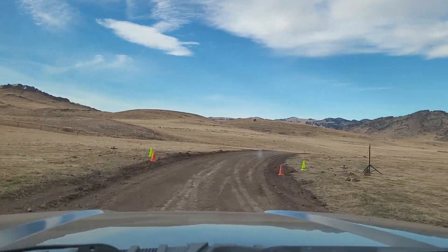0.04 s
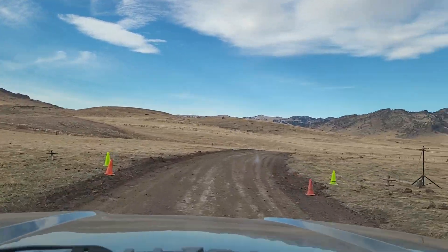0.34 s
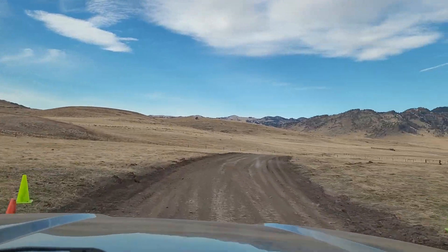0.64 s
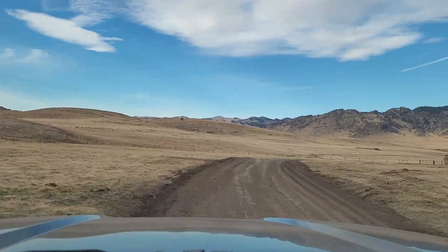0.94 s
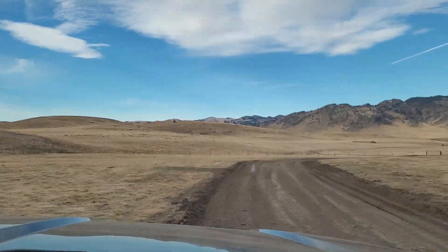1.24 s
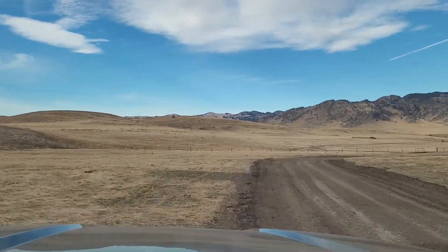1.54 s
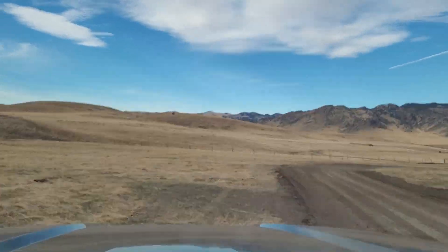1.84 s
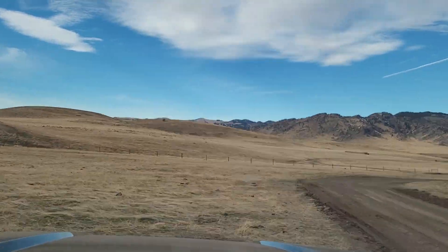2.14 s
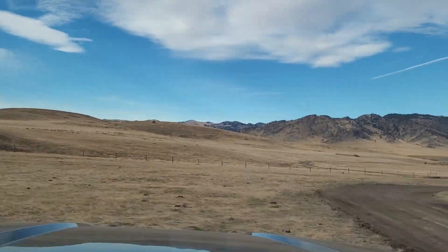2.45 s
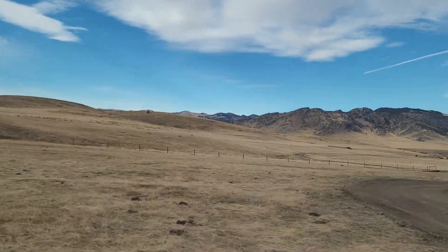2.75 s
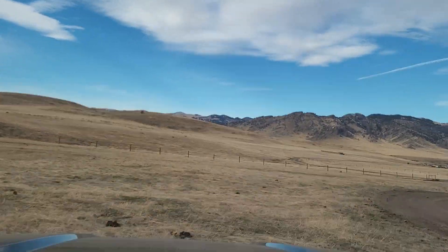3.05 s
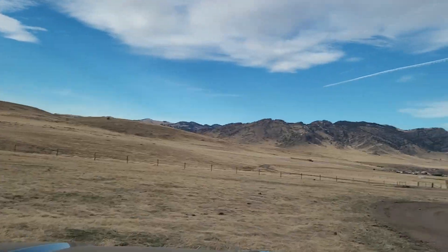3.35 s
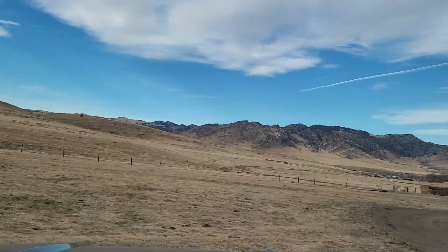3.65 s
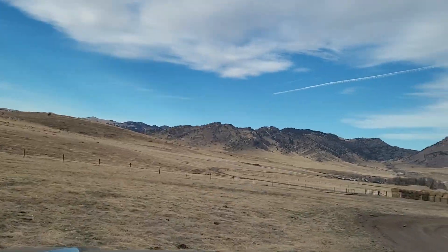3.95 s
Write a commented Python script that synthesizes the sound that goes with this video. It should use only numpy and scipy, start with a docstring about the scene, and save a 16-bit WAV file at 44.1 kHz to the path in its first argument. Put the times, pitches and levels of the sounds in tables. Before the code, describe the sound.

A pickup truck drives over rough ground, heard from inside the cab. The engine sinks to a low rumble as tyres roar and crunch. Bumps bring clatters and thumps, stones ping, and the engine picks up at the end.

```python
"""Pickup on rough ground

From the cab, a pickup leaves a gravel track for rough grass. The engine sinks to a low rumble and
picks up at the end. The cab booms on its springs, tyres roar through the floor and dirt crunches.
Bumps set loose parts clattering, knocking and jingling; stones ping off the body, sand sprays it
and grass swishes along the underside."""
import sys
import numpy as np
from scipy import signal
from scipy.fft import rfft, irfft
from scipy.io import wavfile
from scipy.ndimage import uniform_filter1d

SR = 44100
rng = np.random.default_rng(int(sys.argv[2]) if len(sys.argv) > 2 else 0)


def store_wav(level_fs):
    """Save 16-bit WAV to argv[1]."""
    pcm = np.round(np.clip(np.atleast_2d(level_fs), -1, 1) * 32767)
    wavfile.write(sys.argv[1], SR, pcm.T.astype(np.int16))


N = 176400
T = np.arange(N) / SR
SIDES = np.array([[1], [-1]])   # opposite signs for left and right

# crankshaft speed: t/s, f/Hz
CRANK_SPEED = [(0, 48.85), (.1, 48.1), (.2, 45.95), (.32, 42.51), (.52, 35.72), (.75, 33.07), (1.6, 31.74),
               (3.6, 27.81), (4, 33.2)]
# how hard the engine works: t/s, level/dB
THROTTLE = [(0, -28), (.3, -22.5), (.55, -25), (.9, -32.5), (1.6, -34), (3.55, -45), (3.78, -30),
            (4, -29.5)]
# engine orders: multiple of crank speed, level/dB
ENGINE_ORDERS = [(3, -5), (5, -5.5), (6, -7.5), (7, -9), (8, -7), (11, -12.5), (12, -22), (13, -17)]
# air resonances of the cab that lift orders gliding through: f/Hz, lift/dB
CAB_AIR = [(131, 13), (165, 5.61), (340, 8.3), (520, 6.3)]
# intake rush: f/Hz, level/dB
INTAKE_EQ = [(150, 11), (600, -3.5), (1200, -10.5), (2500, -16), (4500, -32)]
# cab boom: t/s, level/dB
BOOM_FADER = [(0, -20), (.5, -24.5), (.63, -11.5), (.76, -24.5), (1.28, -17), (1.55, -27), (1.84, -12),
              (1.95, -22), (2.92, -20), (3.08, -18.5), (3.65, -25), (4, -29)]
# cab boom: f/Hz, level/dB
BOOM_EQ = [(20, -36), (26, -13.5), (36, 3.5), (61, 9.5), (75, -4.5), (90, -28), (130, -45)]
# tyre roar: t/s, level/dB
ROAR_FADER = [(0, -24), (1.2, -23.5), (1.6, -27.5), (1.85, -19), (2.25, -22.5), (2.85, -24.5), (3.05, -22),
              (3.3, -28), (4, -37)]
# tyre roar: f/Hz, level/dB
ROAR_EQ = [(60, 7), (90, -2.5), (125, 3.5), (200, -4), (360, -6), (450, -22.5), (700, -31), (1200, -43.5)]
# dirt crunch: t/s, coarse level/dB, fine level/dB
CRUNCH_FADERS = [(0, -34.5, -63), (.25, -40, -55), (.5, -48, -50), (.62, -33, -44), (.72, -54.5, -56),
                 (1.12, -43.5, -52), (1.35, -50.5, -57.5), (1.7, -47, -54.5), (1.85, -38, -38),
                 (2.22, -40.5, -42), (2.6, -42.5, -49), (3.05, -41.5, -49), (3.55, -47, -56), (4, -68, -63)]
# body of the crunch: f/Hz, level/dB
COARSE_EQ = [(400, 20.5), (700, 11.5), (1150, 9), (1700, -14), (2400, -6), (3500, -16.5), (5000, -49)]
# fizz of the crunch: f/Hz, level/dB
FINE_EQ = [(2000, 6.5), (7000, 0), (9000, -7.5), (12000, -1), (15500, 0)]
# body panel resonances: f/Hz, width/Hz, level/dB
PANEL_RESONANCES = [(509, 48, 10), (742.4, 15, 3), (835, 36, 2), (1163, 84, 3.5), (1523, 58, 0),
                    (2130, 170, -3), (2580, 87, -7), (2974, 130, -11), (4960, 260, -14.5)]
# loose parts clatter: t/s, clack level/dB, rattle level/dB
CLATTER_CUES = [(0.3297, -33.5, -35), (0.3911, -11, -21), (0.4458, -19.5, -27), (0.552, -40, -41),
                (0.5898, -40, -42), (0.6322, -25, -41), (1.052, -42, -42), (1.1311, -58.5, -46.5),
                (1.744, -31.5, -35.5), (1.809, -18, -27), (1.8396, -22.5, -24.5), (1.858, -25, -28),
                (1.9, -21.5, -25.5), (1.984, -25, -26), (2.1025, -59.5, -38), (2.1677, -28, -30.5),
                (2.192, -32, -26.5), (2.2202, -15.5, -26.5), (2.328, -30.5, -30.5), (2.47, -34.5, -39),
                (2.9076, -36, -38), (2.993, -33.5, -34.5), (3.0274, -32, -40.5), (3.2853, -38, -36.5),
                (3.913, -62, -52)]
# bright top of the clatter: f/Hz, level/dB
RATTLE_EQ = [(1200, -6.5), (2500, 5), (7500, -3), (9000, -9.5), (12000, -2.5), (15500, -6)]
# dull knocks of the trim: t/s, level/dB, pitch ratio
THUD_CUES = [(.395, -15, 0.99), (.451, -11.5, 0.96), (1.155, -27, 1.13), (1.856, -8, 1.004),
             (1.908, -13, 1.09), (1.984, -11, 1), (2.226, -19, 1.01), (2.542, -25.5, 1.09)]
# ring of the trim: f/Hz, level/dB, t60/s
TRIM_MODES = [(306.3, 5, 0.14), (368.6, -0.5, 0.15), (519, -12.5, 0.096)]
# hard bangs of hollow parts: t/s, level/dB, pitch ratio
BANG_CUES = [(.395, -12.5, 1), (1.848, -17, 0.86)]
# ring of the hollow parts: f/Hz, level/dB, t60/s
HOLLOW_MODES = [(531, 1, 0.075), (850, 2, 0.12), (1070, 2.7, 0.013)]
# stones hit the body: t/s, level/dB, f/Hz
PING_CUES = [(.7915, -36, 6400), (.8445, -41, 6200), (1.1847, -43, 5568), (1.4421, -43, 6200),
             (1.6661, -39, 6177), (2.5205, -25, 6410), (2.584, -28, 6600), (2.6363, -26, 6890),
             (2.687, -28, 5990), (2.7485, -25.5, 6680), (2.7807, -33, 6166), (3.6945, -32.5, 6900),
             (3.7965, -29, 2444), (3.9779, -36.5, 2842)]
# sprays of sand: peak t/s, width/s, level/dB
SAND_CUES = [(.6, 0.065, -40), (.641, 0.0093, -25), (3.41, 0.094, -44)]
# hiss of the sand: f/Hz, level/dB
SAND_EQ = [(7000, -1.5), (10000, -8), (12000, 1), (15500, 1.5)]
# resonances of a loose metal part: f/Hz, width/Hz, level/dB
METAL_RESONANCES = [(2590, 150, -3), (5140, 230, -1)]
# blows to the suspension: t/s, level/dB
JOLT_CUES = [(2.231, -13.5), (2.986, -7.5), (3.025, -8.5)]
# low ring of the cab: f/Hz, level/dB, t60/s
CAB_MODES = [(62.7, 1, 0.14), (126.5, 2, 0.2), (163, -21, 0.05)]
# grass brushes past: peak t/s, width/s, level/dB
GRASS_CUES = [(2.981, 0.035, -43), (3.411, 0.062, -41.5)]
# sheet metal of the underside: f/Hz, level/dB
UNDERSIDE_RESONANCES = [(1570, 1.5), (2400, 8.5), (2940, 2.5), (3250, 6)]

TREBLE_ALIKE, CLACK_ALIKE = 0.012, 0.06   # left-right likeness: 0 is wide, 1 is mono
RATTLE_T60_S, CLACK_T60_S = 0.056, 0.084


def from_db(db):
    """Decibels to gain."""
    return 10 ** (np.asarray(db) / 20)


def unit_rms(x):
    """Scale to unit rms."""
    return x / np.sqrt(np.mean(x ** 2) + 1e-20)


def automation(rows):
    """One curve per column after the time, read at every sample."""
    times, *columns = np.transpose(rows)
    return [np.interp(T, times, column) for column in columns]


def drift(rate_hz):
    """A smooth random wobble of unit rms."""
    pole = np.exp(-80 * np.pi * rate_hz / SR)
    slow = signal.lfilter([1], [1, -2 * pole, pole * pole], rng.standard_normal(N // 40 + 2002))[2000:]
    return np.interp(np.arange(N) / 40, np.arange(len(slow)), unit_rms(slow))


def stereo(pair, alike):
    """Mix two unrelated signals as mid and side."""
    return np.sqrt(1 + alike) * pair[0] + np.sqrt(1 - alike) * pair[1] * SIDES


def noise(alike):
    """White stereo noise."""
    return stereo(rng.standard_normal((2, N)), alike) / np.sqrt(2)


def grit(alike, grains_per_s=1400, grain_share=0.27, spread_db=7):
    """Tiny impacts of uneven size on a smooth hiss."""
    sizes = from_db(spread_db * np.minimum(rng.exponential(1, (2, N)), 4)) * rng.choice([-1, 1], (2, N))
    lands = rng.random((2, N)) < grains_per_s / SR
    grains = unit_rms(stereo(sizes * lands, alike))
    return np.sqrt(grain_share) * grains + np.sqrt(1 - grain_share) * noise(alike)


def equalise(x, eq):
    """Apply an EQ curve that rolls off beyond its ends; unit rms."""
    hz, db = np.transpose(eq)
    f = np.maximum(np.arange(N // 2 + 1) * SR / N, 1)
    skirts = 1 / np.sqrt((1 + (hz[0] / 2 / f) ** 6) * (1 + (f / hz[-1] / 2) ** 6))
    curve = from_db(np.interp(np.log(f), np.log(hz), db))
    return unit_rms(irfft(rfft(x) * skirts * curve, N))


def resonate(x, hz, width_hz):
    """One resonance with unit gain at its peak."""
    r = np.exp(-np.pi * width_hz / SR)
    feedback = [1, -2 * r * np.cos(2 * np.pi * hz / SR), r * r]
    return signal.lfilter(np.array([1, 0, -1]) * (1 - r * r) / 2, feedback, x + 1e-18)


def panels(x, resonances=PANEL_RESONANCES):
    """Sheet metal rings: parallel resonances of alternating polarity."""
    return sum((-1) ** k * from_db(db) * resonate(x, hz, width)
               for k, (hz, width, db) in enumerate(resonances))


def in_cab(x, t60_s=0.046, wet_db=-4):
    """Add close reflections from glass and trim."""
    age, wet = T[:SR // 8], from_db(wet_db)
    walls = rng.standard_normal((2, len(age))) * from_db(-60 * age / t60_s) * np.minimum(age / .001, 1)
    walls *= wet / np.sqrt(np.sum(walls ** 2, axis=1, keepdims=True))
    return (x + signal.fftconvolve(x, walls, axes=1)[:, :N]) / np.sqrt(1 + wet ** 2)


def bursts(times, levels_db, t60_s, attack_s=0.0046, hold_s=0.0089):
    """Attack-hold-decay envelopes, summed in power."""
    power = np.zeros(N)
    for s, db in zip(times, levels_db):
        first = int((s - attack_s / 2) * SR)
        age = T[:min(N - first, SR // 2)]
        decaying_s = np.maximum(age - attack_s - hold_s, 0)
        shape = np.minimum(age / attack_s, 1) * from_db(-60 * decaying_s / t60_s)
        power[first:first + len(age)] += (from_db(db) * shape) ** 2
    return np.sqrt(power)


def swells(cues):
    """Bell-shaped fades in and out."""
    return sum(from_db(db) * np.exp(-((T - s) / width) ** 2) for s, width, db in cues)


def struck(cues, modes, contact_s, spread):
    """Blows ring a body's modes; higher modes sit wider in the stereo image."""
    out = np.zeros((2, N))
    for s, db, pitch in cues:
        age = T[:N - int(s * SR)]
        attack = 1 - np.exp(-age / contact_s)
        for hz, mode_db, t60 in modes:
            side_phase = spread * hz / modes[0][0] * SIDES
            ring = np.sin(2 * np.pi * (hz * pitch * age + rng.random()) + side_phase)
            out[:, N - len(age):] += from_db(db + mode_db - 60 * age / t60) * ring * attack
    return out


def engine(jitter=0.0017, waver_db=4, dulling=0.78, air_half_width=0.035):
    """Wavering crank orders and intake rush; off the throttle the orders dull and the rush fades."""
    (crank_hz,), (throttle_db,) = automation(CRANK_SPEED), automation(THROTTLE)
    turns = np.cumsum(crank_hz * (1 + jitter * drift(14.4))) / SR
    opening_db = THROTTLE[0][1]
    slack_db = np.minimum(throttle_db - opening_db, 0)
    upper_orders = [(order, -26.5 - 0.83 * (order - 14)) for order in range(14, 26)]
    drone = 0
    for order, db in ENGINE_ORDERS + upper_orders:
        lift_db = sum(peak_db / (1 + ((order * crank_hz / hz - 1) / air_half_width) ** 2)
                      for hz, peak_db in CAB_AIR)
        tilt_db = dulling * slack_db * np.log2(order / 5)
        gain = from_db(throttle_db + db + lift_db + tilt_db + waver_db * drift(7.2))
        phase = 2 * np.pi * (order * turns + rng.random()) + rng.normal(0, 0.31, (2, 1))
        drone += gain * np.sqrt(2) * np.sin(phase)
    rush = from_db(opening_db - 8.5 + 2.83 * slack_db) * equalise(noise(alike=0.17), INTAKE_EQ)
    return drone + rush


def cab_boom(pan_db=-1.15):
    """The cab booms on its springs: a deep bed, slightly to the right."""
    boom = equalise(noise(alike=0.95), BOOM_EQ)
    envelope = np.sqrt(uniform_filter1d(np.mean(boom ** 2, axis=0), size=4000))
    squashed = boom / envelope ** 1.87   # ducks the noise's own surges and fills its dips
    return squashed * from_db(automation(BOOM_FADER)[0] + pan_db * SIDES)


def tyre_roar(flutter_db=2):
    """The tyres roar unevenly through the floor."""
    gain = from_db(automation(ROAR_FADER)[0] + flutter_db * drift(6.6))
    return gain * equalise(noise(alike=0.87), ROAR_EQ)


def dirt_crunch(clump_db=3, ring_db=-8):
    """Dirt crunches in clumps under the tyres: coarse grains ring the panels, fine ones fizz."""
    coarse_db, fine_db = automation(CRUNCH_FADERS)
    clumps_db = clump_db * (drift(24) + drift(100))
    coarse = equalise(grit(alike=0.05), COARSE_EQ)
    ring = from_db(ring_db) * unit_rms(panels(grit(alike=0.033)))
    fine = equalise(grit(TREBLE_ALIKE), FINE_EQ) * from_db(fine_db + clumps_db)
    return (coarse + ring) * from_db(coarse_db + clumps_db) + in_cab(fine)


def clatter():
    """Loose parts hit in tight flurries that ring the panels, with a bright rattle on top."""
    times, clack_db, rattle_db = np.transpose(CLATTER_CUES)
    contacts = noise(CLACK_ALIKE)
    clack = panels(contacts * bursts(times, clack_db, CLACK_T60_S)) / np.std(panels(contacts))
    rattle = equalise(noise(TREBLE_ALIKE) + 0.48 * grit(TREBLE_ALIKE), RATTLE_EQ)
    return clack + in_cab(rattle * bursts(times, rattle_db, RATTLE_T60_S))


def trim_thuds():
    """Soft contacts knock a dull note out of the trim."""
    return struck(THUD_CUES, TRIM_MODES, contact_s=0.0024, spread=0.23)


def hollow_bangs():
    """Hard contacts ring hollow parts with a sharp attack."""
    return struck(BANG_CUES, HOLLOW_MODES, contact_s=0.00068, spread=0.54)


def stone_pings(chip_count=38, chip_hz=5700, relative_width=0.13, t60_cycles=111, attack_s=0.00084):
    """Stones ping off the body, a broad resonance with a bright snap; faint chips fly at random."""
    out = np.zeros((2, N + SR))
    age = T[:SR // 8]
    chips = [(rng.uniform(0.41, T[-1]), rng.normal(-54, 0.53), chip_hz * 2 ** rng.uniform(-0.69, 0.6))
             for _ in range(chip_count)]
    for s, db, hz in PING_CUES + chips:
        hit = rng.standard_normal((2, len(age)))
        ring = unit_rms(resonate(hit, hz, hz * relative_width))
        snap = from_db(-8.5) * hz / chip_hz * np.diff(hit, prepend=0)
        envelope = from_db(db - 60 * age * hz / t60_cycles) * (1 - np.exp(-age / attack_s))
        first = int(s * SR)
        out[:, first:first + len(age)] += (ring + snap) * envelope
    return out[:, :N]


def sand_spray():
    """Fine sand hits the body in puffs of gritty hiss."""
    return swells(SAND_CUES) * equalise(grit(TREBLE_ALIKE), SAND_EQ)


def metal_jingle(span_s=(1.85, 2.45), count=12):
    """A small metal part buzzes through the big bump; each run of contacts rings its resonances."""
    contacts = noise(CLACK_ALIKE)
    contacts *= bursts(rng.uniform(*span_s, count), rng.normal(-25.5, 2.8, count), RATTLE_T60_S)
    return sum(from_db(db) * resonate(contacts, hz, width) for hz, width, db in METAL_RESONANCES)


def suspension_jolts():
    """Blows to the suspension thump the cab's low modes."""
    return struck([(s, db, 1) for s, db in JOLT_CUES], CAB_MODES, contact_s=0.0043, spread=0.06)


def grass_swish(width_hz=176):
    """Dry stalks rasp along the underside and ring its sheet metal."""
    resonances = [(hz, width_hz, db) for hz, db in UNDERSIDE_RESONANCES]
    return swells(GRASS_CUES) * unit_rms(panels(grit(TREBLE_ALIKE), resonances))


def scene():
    """The mix from behind the windscreen: a driving bed with spot effects on top."""
    bed = engine() + cab_boom() + tyre_roar() + dirt_crunch()
    spots = clatter() + trim_thuds() + hollow_bangs() + stone_pings() + sand_spray()
    return bed + spots + metal_jingle() + suspension_jolts() + grass_swish()


def record(dry, ceiling=1.5, cutoff_hz=16700):
    """Soft saturation rounds the peaks; a steep low-pass trims the very top."""
    lowpass = signal.cheby2(16, 70, cutoff_hz, fs=SR, output="sos")
    return signal.sosfilt(lowpass, ceiling * np.tanh(dry / ceiling))


dry = scene()
out = record(dry)
store_wav(out)
```